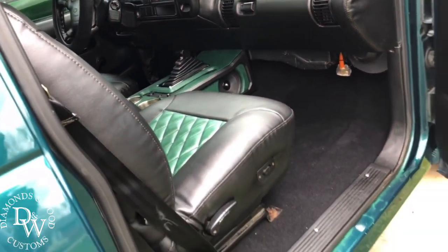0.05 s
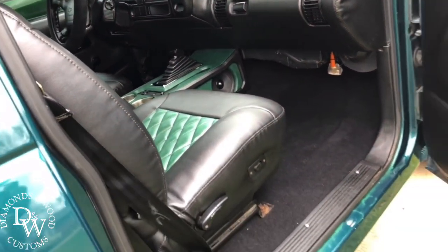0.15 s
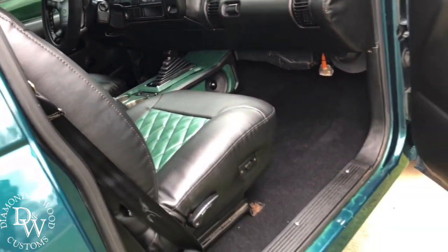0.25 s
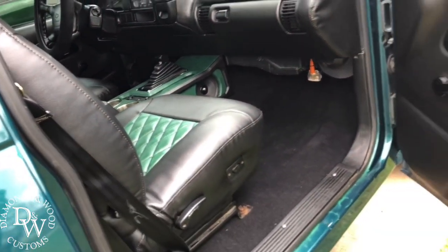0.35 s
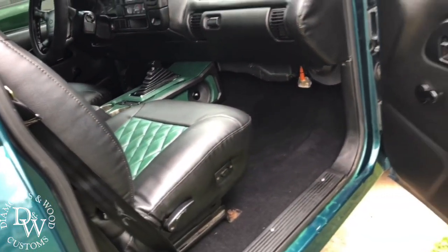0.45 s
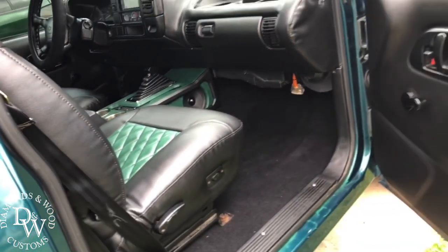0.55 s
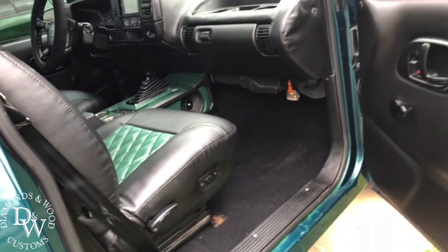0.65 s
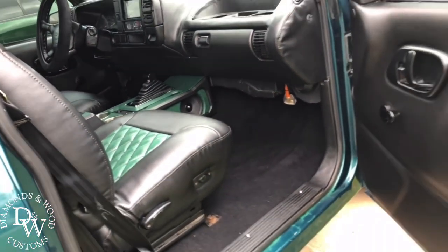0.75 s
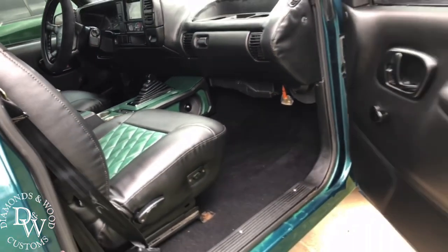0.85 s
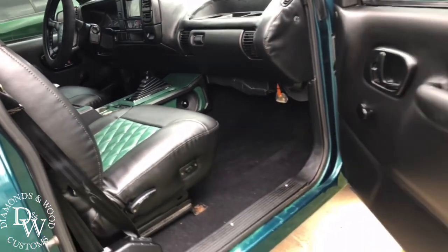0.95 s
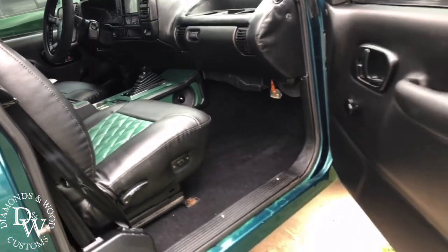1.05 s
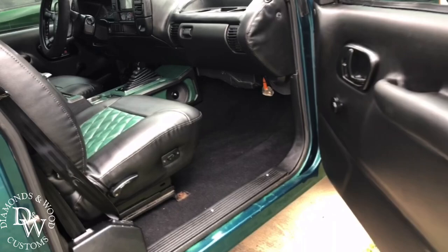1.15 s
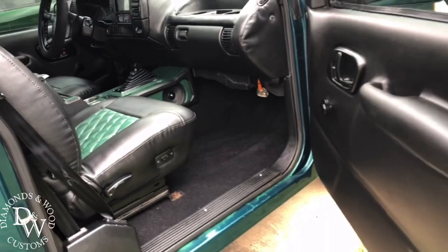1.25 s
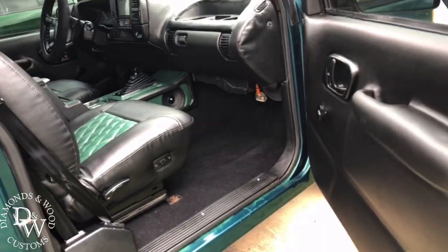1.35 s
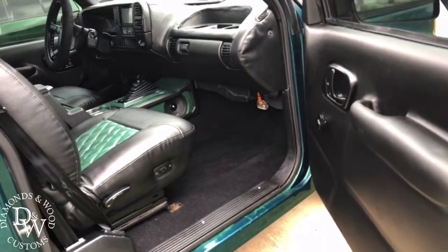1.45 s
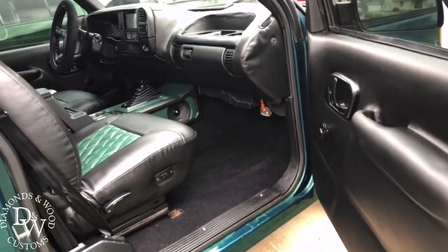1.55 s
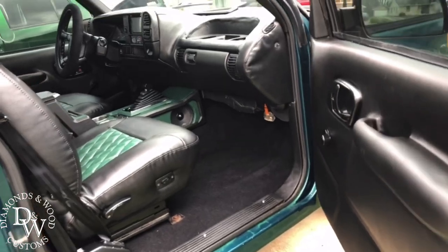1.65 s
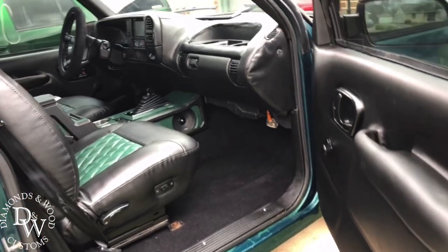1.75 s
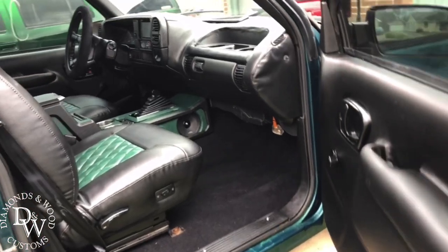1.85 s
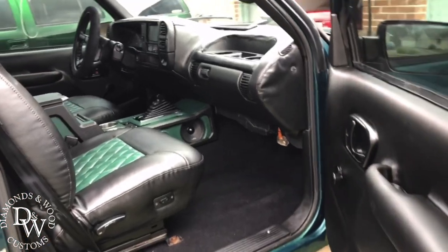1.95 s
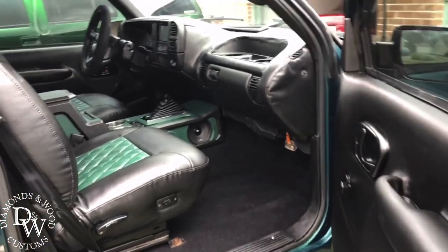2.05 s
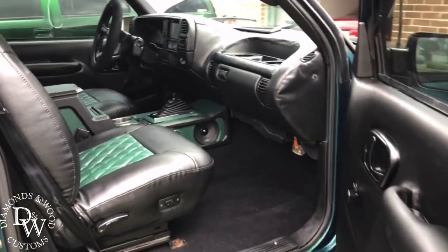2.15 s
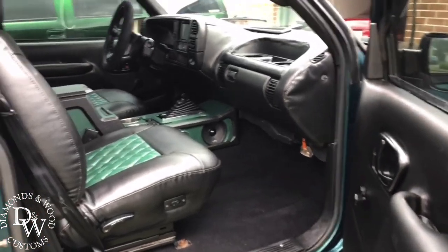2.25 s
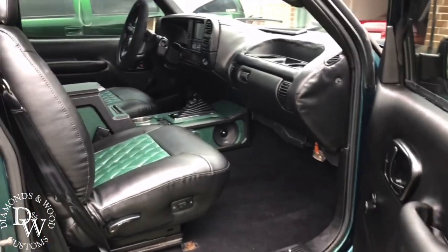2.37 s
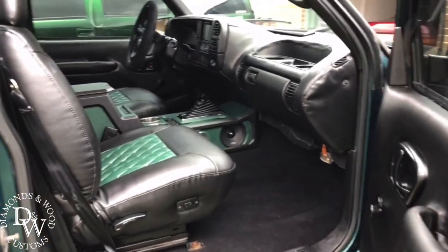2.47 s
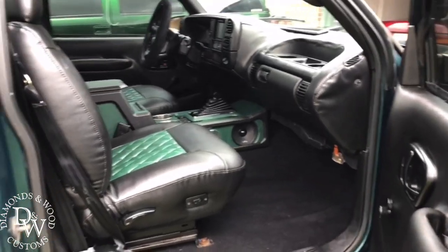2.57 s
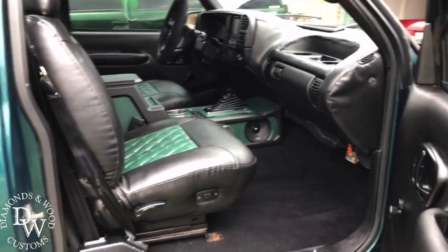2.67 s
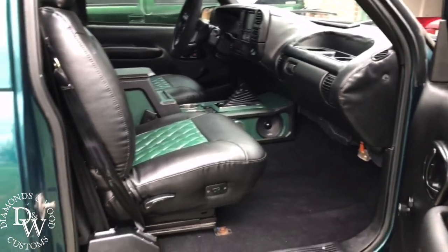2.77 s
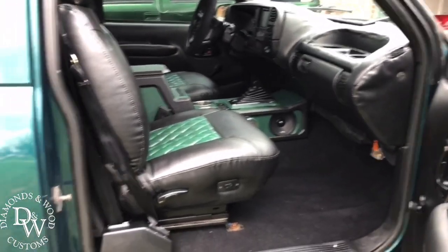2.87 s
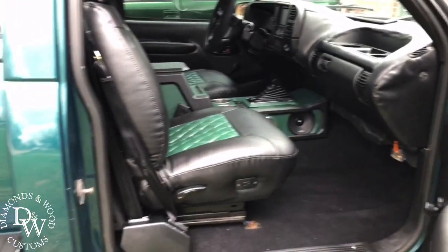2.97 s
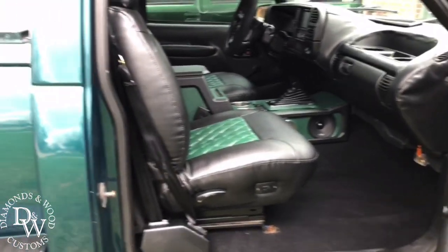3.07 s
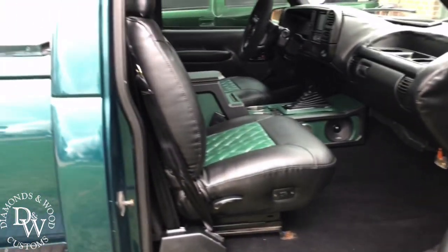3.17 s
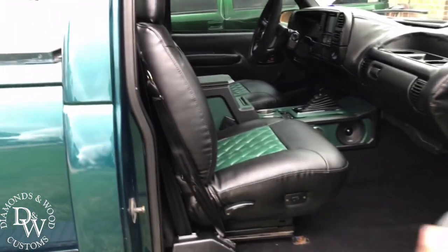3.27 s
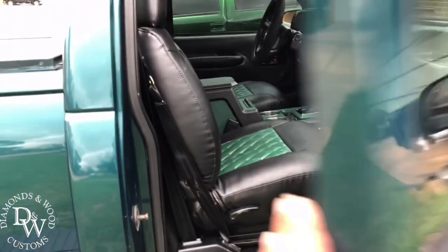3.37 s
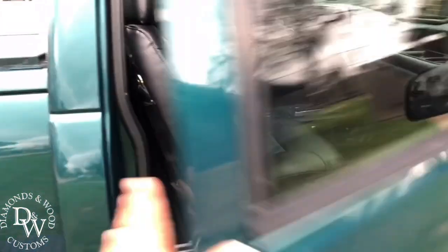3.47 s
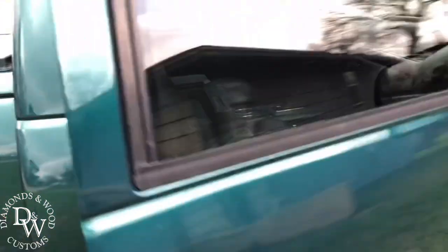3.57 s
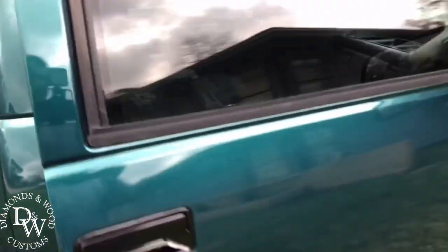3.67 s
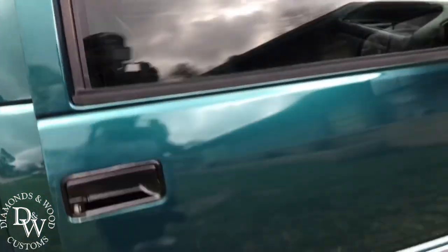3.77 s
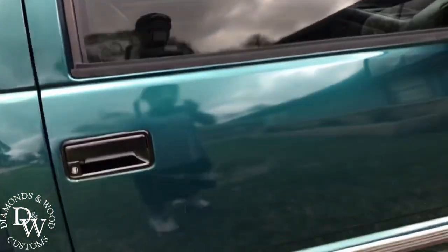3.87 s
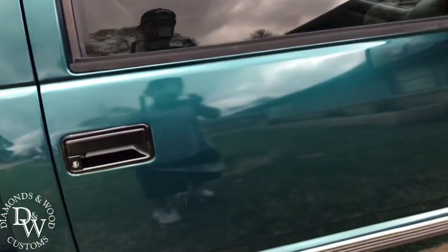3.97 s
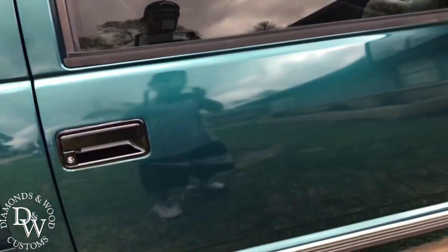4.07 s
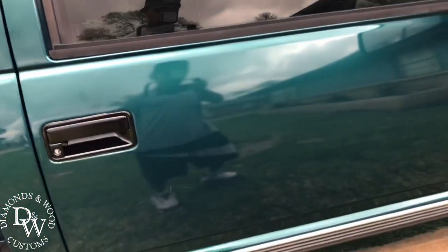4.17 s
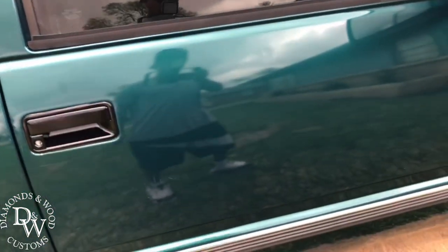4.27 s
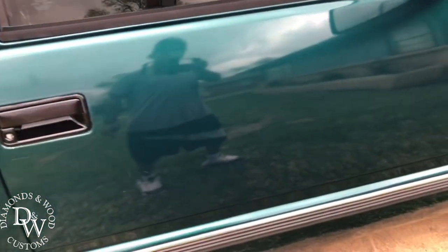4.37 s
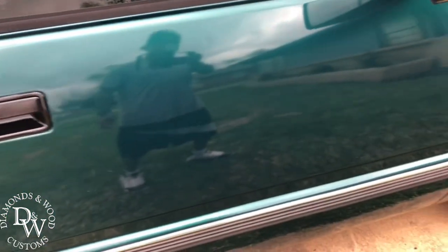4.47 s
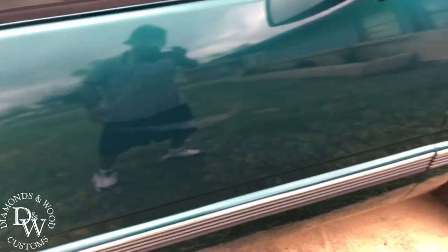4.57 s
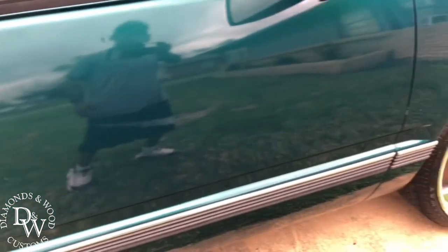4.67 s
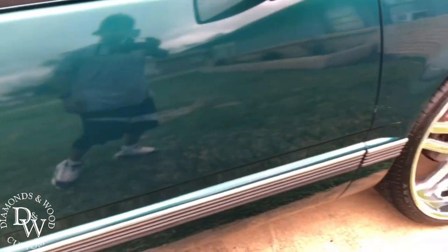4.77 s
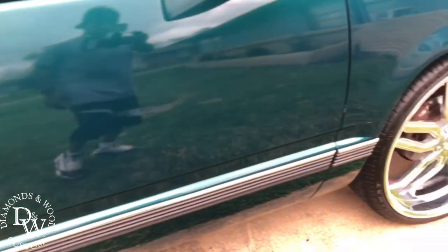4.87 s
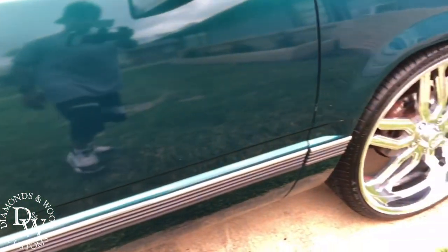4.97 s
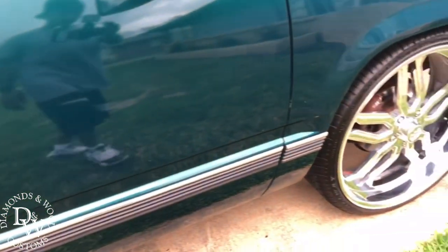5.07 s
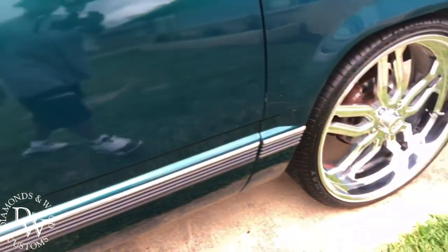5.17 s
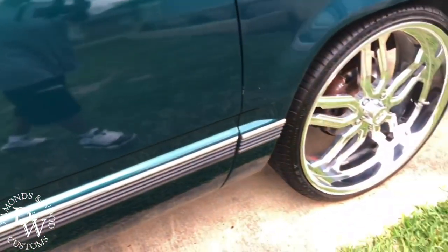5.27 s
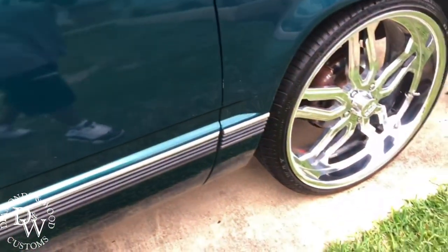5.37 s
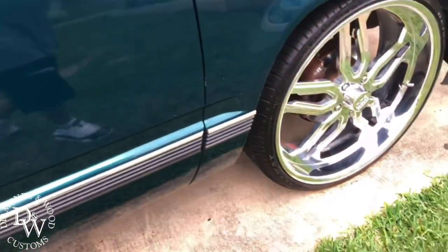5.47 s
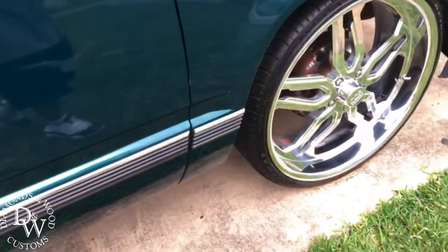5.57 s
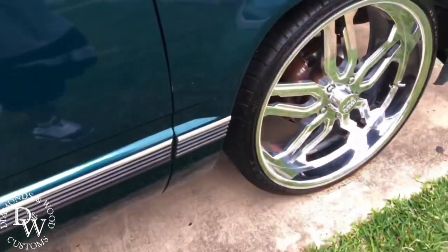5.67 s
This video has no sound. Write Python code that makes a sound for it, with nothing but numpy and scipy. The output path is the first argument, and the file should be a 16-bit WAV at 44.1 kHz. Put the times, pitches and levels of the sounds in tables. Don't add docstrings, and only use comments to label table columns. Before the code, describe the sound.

Quiet outdoor background of far road roar with thin tyre whine. Someone moves close to the microphone, clothes rustling, feet thudding softly, grit and hinge ticking; a tiny bird chirp falls just before the door moves. A swelling whoosh ends in a single hard, solid vehicle door slam with rattling rebounds and low boom, dying within about half a second. Faint movement and steady traffic remain.

```python
import sys
import numpy as np
from scipy import signal
from scipy.io import wavfile

SR = 44100
rng = np.random.default_rng(int(sys.argv[2]) if len(sys.argv) > 2 else 0)


def natural_amplitude(level_db):
    exponent = np.asarray(level_db, float) / 20
    return 10 ** exponent


def master(y):
    cut = np.clip(np.atleast_2d(y).T, -1, 1)
    pcm = np.round(cut * 32767)
    wavfile.write(sys.argv[1], SR, pcm.astype(np.int16))


N = 252252
TIME = np.arange(N) / SR

# [t/s, level/dB]
ROAD_LEVEL = [
    (0.0, -52),
    (1.58, -49.5),
    (2.87, -50),
    (3.18, -48),
    (3.92, -48.5),
    (4.46, -50),
    (5.07, -50),
    (5.72, -50),
]
# [f/Hz, level/dB per Hz]
RUMBLE_COLOUR = [(15, -47), (25, -15), (81, 0), (113, -6), (168, -5.5), (193, -9), (289, -20), (336, -35.5),
                 (400, -18.5), (520, -69), (880, -120)]
# [f/Hz, level/dB per Hz]
ROAR_COLOUR = [(150, -11), (250, -2.5), (330, -4), (436, -4), (557, -2.5), (1100, 0.5), (2570, -20),
               (3460, -26.5), (10400, -41), (15200, -53), (16000, -32)]
# [start t/s, length/s, first f/Hz, glide/Hz per s, level/dB]
TYRE_WHINES = [(.6, 0.62, 905, -29, -60), (1.33, 0.2, 752, 2, -55), (1.78, 0.53, 1126, -3.5, -54),
               (2.32, 0.88, 916, -5.5, -58.5), (2.98, .24, 790, -30.5, -59), (3.22, .45, 1135, -55, -62),
               (4.2, 0.92, 1057, -8., -65), (5.25, 0.64, 899, -170., -54.5)]
# [start t/s, length/s, level/dB]
INSECT_BOUTS = [
    (1.28, 1.85, -82),
    (4.344, 0.57, -77.5),
]
# [start t/s, length/s, first f/Hz, glide/Hz per s, level/dB]
BIRD_CHIRP = [
    (2.715, .07, 8500, -16500, -75),
]
# [start t/s, length/s, level/dB]
MOVEMENTS = [(0.0, 0.31, -69.5), (0.274, 0.18, -69.5), (0.55, 0.37, -66), (0.919, 0.064, -66),
             (0.964, 0.14, -71.5), (1.1, .16, -68), (1.457, 0.36, -69), (1.694, 0.45, -68.5),
             (2.063, 0.1, -68.5), (2.312, 0.14, -66.5), (2.39, 0.058, -59), (2.464, .34, -74),
             (3.069, 0.18, -68.5), (3.31, 0.056, -70.5), (3.42, .065, -76), (3.53, 0.038, -71.5),
             (3.77, 0.043, -86), (4.095, 0.16, -73), (4.20, 0.096, -69.5), (4.264, 0.061, -61.5),
             (4.32, 0.29, -70), (4.665, 0.07, -72), (4.764, 0.11, -68.5), (4.948, 0.12, -68.5),
             (5.06, 0.24, -64.5), (5.294, 0.072, -64.5), (5.35, 0.22, -68), (5.554, .09, -66.5)]
# [f/Hz, level/dB per Hz]
CLOTH_COLOUR = [(1180, -24), (2000, 2), (2360, -2.5), (4080, -4), (8330, -4.5), (13600, -4), (15100, 1.5),
                (16000, -7)]
# [t/s, peak level/dB, centre f/Hz, width/octaves]
TICKS = [(.629, -52.5, 7000, 0.5), (.820, -50, 8000, 1.8), (0.947, -45, 3700, 2.1),
         (1.126, -56, 10000, 1.05), (1.301, -56, 12000, 1.24), (1.791, -50, 6060, 3), (2.849, -37, 700, 2),
         (2.926, -46, 8000, 3.4), (2.927, -52, 5240, 0.069), (3.003, -51, 4405, .06),
         (3.003, -53, 3800, .06), (3.270, -52, 4170, 0.31), (3.338, -52, 4600, 0.81),
         (3.448, -50, 7000, 2.5), (3.457, -59, 12000, 1.1), (3.466, -43.5, 3180, 2),
         (3.465, -37, 2400, 0.34), (3.621, -46, 7000, 2.4), (3.621, -46, 2500, 1.1),
         (4.717, -59, 12000, .9), (4.80, -55, 4920, 1.9), (4.987, -52.5, 4500, 1.4),
         (5.311, -52.5, 4000, 1.6), (5.43, -55, 5000, 1.6), (5.585, -51, 6000, 2.3)]
# [t/s, peak level/dB, f/Hz]
THUDS = [(.604, -52, 83.6), (1.405, -38, 91.5), (1.447, -31, 102), (2.066, -44, 78.4), (2.851, -30, 199),
         (2.890, -31.5, 199), (2.932, -34, 90), (3.141, -26.5, 180), (3.158, -32, 125), (3.183, -32.5, 180),
         (3.20, -32.5, 75.6), (3.54, -35, 207), (3.575, -34.5, 248), (3.590, -31, 94), (3.605, -39, 186),
         (3.618, -27, 77), (3.655, -34, 98), (3.70, -32.5, 80.5), (4.68, -36, 89), (5.425, -36, 87),
         (5.61, -39, 70), (5.68, -35.5, 75)]
# [peak t/s, level/dB, rise/dB per s, fall/dB per s, bright share/1]
AIR_RUSHES = [
    (3.39, -46.5, 200., 250., .04),
    (3.63, -43.5, 312, 125., 0.083),
    (3.857, -29, 896, 4400., 0.47),
]
# [t/s, peak level/dB, f/Hz]
BOOMS = [(3.868, -15.5, 69.6), (3.871, -5.5, 287), (3.874, -20, 155), (3.876, -22, 393), (3.882, -11, 216),
         (3.888, -11.5, 305), (3.882, -10, 42), (3.905, -13, 144), (3.921, -10.5, 186), (3.926, -8.5, 52),
         (3.927, -10, 97.2), (3.952, -10.5, 135.5), (3.972, -14.5, 99), (3.995, -16.5, 78),
         (4.015, -24.5, 157), (4.070, -22.5, 151), (4.078, -21.5, 92), (4.105, -28, 43.6),
         (4.142, -27.5, 146), (4.205, -28, 70.6), (4.265, -27, 77), (4.31, -37, 59.4), (4.40, -35, 86),
         (4.50, -32, 63.5)]
# [t/s, peak level/dB, f/Hz]
TRIM_RINGS = [(3.872, -5, 836), (3.886, -6, 690), (3.942, -24.5, 1270), (3.962, -21, 695),
              (3.982, -25, 822), (4.012, -22.5, 637), (4.028, -25.5, 847), (4.082, -31, 822),
              (4.125, -41, 810)]
# [t/s, peak level/dB, centre f/Hz, width/octaves]
LATCH_RINGS = [(3.848, -49, 6000, 1.2), (3.8575, -13, 1750, 0.26), (3.8575, -13, 2440, 0.34),
               (3.868, -14, 1300, 0.47), (3.858, -33, 9000, .08), (3.866, -18.5, 4000, 0.18),
               (3.873, -17, 6120, 0.1), (3.874, -21.5, 9560, 0.059), (3.874, -23, 11850, 0.079),
               (3.878, -30, 7500, .06), (3.892, -27, 6160, 0.12), (3.907, -37, 6300, 0.13),
               (3.929, -31, 9200, .08), (3.977, -48, 8700, 0.083)]
# [t/s, metal level/dB, glass level/dB]
CONTACTS = [(3.8579, -5, -34), (3.865, -14, -32.5), (3.8702, -2.5, -29), (3.872, -15, -27),
            (3.881, -1.5, -27), (3.888, -2.5, -25.5), (3.895, -10, -30), (3.9054, -13, -40),
            (3.915, -16, -41), (3.9273, -21, -30.5), (3.9356, -27, -41), (3.9494, -32, -47),
            (3.9644, -22, -46), (3.9764, -31, -38.5), (3.9875, -36, -49), (4.018, -29, -46.5),
            (4.0344, -30, -53), (4.0617, -31, -52.5), (4.0844, -38, -66)]
# [f/Hz, level/dB per Hz]
METAL_COLOUR = [(500, 3.5), (900, -3), (1400, -2.5), (2200, -10), (3200, -16.5), (5000, -20)]
# [f/Hz, level/dB per Hz]
GLASS_COLOUR = [(3000, -4.5), (4500, -6.5), (6200, 5.5), (8000, -6), (9600, 4), (12000, -7), (16000, -7)]
# [t/s, peak level/dB]
BLOWS = [(3.861, -6), (3.870, -7), (3.877, -7), (3.886, -9.5), (3.895, -11.5), (3.904, -5.5), (3.916, -19),
         (3.928, -15), (3.944, -17.5), (3.957, -17), (3.973, -21), (3.99, -25), (4.012, -29),
         (4.030, -26.5), (4.058, -32), (4.08, -29)]
# [f/Hz, level/dB, t60/s]
PANEL_MODES = [(233.4, -12.5, 0.13), (285.7, -13.5, 0.13), (370, -9, 0.042), (413, -27, 0.11),
               (447, -15.5, 0.058), (510, -15, 0.059), (564, -15, 0.098), (610, -18, 0.07),
               (690, -28.5, 0.087), (746, -16, 0.067), (853, -15, 0.05), (910, -41, 0.12), (950, -25, 0.15),
               (1250, -31, 0.084), (1276, -52, .04), (1513, -36, .07), (1790, -18.5, 0.046)]
# [delay t/s, level/dB]
ECHOES = [
    (.021, -38),
    (.047, -14),
    (.083, -23),
    (.131, -32.5),
]

RUMBLE_DB, RUMBLE_FOLLOWS = -49, 0.2
HUM_HZ, HUM_WIDTH_HZ, HUM_DB = 85, 7.9, -56
SHUDDER_S, SHUDDER_DB, SHUDDER_RISE_DB_PER_S, SHUDDER_FALL_DB_PER_S = 4.04, -35.5, 122, 49
CLOTH_ATTACK_SHARE, CLOTH_RELEASE_SHARE = 0.32, 0.28
CLOTH_LEAD_S, CLOTH_REST_DB = 0.025, -75.5
TICK_T60_S, LATCH_T60_S = 0.031, 0.033
THUD_T60_S, BOOM_T60_S, TRIM_T60_S = 0.11, 0.11, 0.18
DAMPING_SLOPE = 0.5
CONTACT_T60_S, CONTACT_RISE_S, SOFTENING = 0.081, 0.00055, 0.011


def rms_one(x):
    return x / np.sqrt(np.mean(x ** 2) + 1e-20)


def drift(rate):
    r = np.exp(-80 * np.pi * rate / SR)
    slow = signal.lfilter([1], [1, -2 * r, r * r], rng.standard_normal(N // 40 + 2002))[2000:]
    return np.interp(np.arange(N) / 40, np.arange(len(slow)), rms_one(slow))


def band(x, low_hz, high_hz):
    edges = np.clip([low_hz, high_hz], [15, 20], [.4 * SR, .45 * SR])
    return signal.sosfilt(signal.butter(2, edges, "band", fs=SR, output="sos"), x)


def coloured(sources, spectrum, patchy_db):
    hz, level_db = np.transpose(spectrum)
    bands = round(3 * np.log2(hz[-1] / hz[0]))
    edges = np.geomspace(hz[0], hz[-1], bands + 1)
    out = 0
    for k, (low, high) in enumerate(zip(edges, edges[1:])):
        gain_db = np.interp(np.log(low * high) / 2, np.log(hz), level_db)
        out = out + natural_amplitude(gain_db + patchy_db * drift(5.2)) * band(sources[k % 2], low, high)
    return out


def grains(shape, per_s, spread_db, smooth):
    sizes = natural_amplitude(spread_db * np.minimum(rng.exponential(1, shape), 4)) * rng.choice([-1, 1], shape)
    clicks = rms_one(sizes * (rng.random(shape) < per_s / SR))
    return rms_one(smooth * rng.standard_normal(shape) + clicks)


def ring(clicks, hz, t60):
    r, w = natural_amplitude(-60 / (t60 * SR)), 2 * np.pi * hz / SR
    return signal.lfilter([0, np.sin(w)], [1, -2 * r * np.cos(w), r * r], clicks + 1e-18)


def add(out, s, sound):
    at = round(s * SR)
    out[at:at + len(sound)] += sound[:N - at]


def hold(start, length, attack_s, release_s):
    attack, release = (TIME - start) / attack_s, (start + length - TIME) / release_s
    return np.clip(np.minimum(attack, release), 0, 1)


def tent(s, peak_db, rise, fall):
    return natural_amplitude(peak_db - np.maximum(rise * (s - TIME), fall * (TIME - s)))


def glides(rows, fade_s):
    out = np.zeros(N)
    for s, length, hz, glide, db in rows:
        t = TIME - s
        out += natural_amplitude(db) * hold(s, length, fade_s, fade_s) * np.sin(2 * np.pi * t * (hz + glide * t / 2))
    return out


def pushes(rows, t60_100, rise_cycles):
    out, t = np.zeros(N), TIME[:30000]
    for s, peak_db, hz in rows:
        t60 = t60_100 * (100 / hz) ** DAMPING_SLOPE
        swell = 1 - np.exp(-t * hz / rise_cycles)
        add(out, s, natural_amplitude(peak_db - 60 * t / t60) * swell * np.sin(2 * np.pi * hz * t))
    return out


def bursts(rows, t60, rise_s):
    out, t = np.zeros(N), TIME[:6000]
    shape = natural_amplitude(-60 * t / t60) * (1 - np.exp(-t / rise_s))
    noises = rng.standard_normal((len(rows), len(t)))
    for (s, peak_db, hz, octaves), noise in zip(rows, noises):
        half = 2 ** (np.clip(octaves, .03, 4) / 2)
        burst = shape * band(noise, hz / half, hz * half)[::-1]
        add(out, s, natural_amplitude(peak_db - 3) * rms_one(burst) * np.sqrt(np.mean(shape ** 2)))
    return out


def engine_hum():
    hum = rms_one(band(rng.standard_normal(N), HUM_HZ - HUM_WIDTH_HZ / 2, HUM_HZ + HUM_WIDTH_HZ / 2))
    firing_hz = HUM_HZ + 2.42 * drift(0.813)
    hum += natural_amplitude(1.5) * np.sin(2 * np.pi * np.cumsum(firing_hz) / SR)
    octave = band(rng.standard_normal(N), 2 * HUM_HZ - HUM_WIDTH_HZ, 2 * HUM_HZ + HUM_WIDTH_HZ)
    return natural_amplitude(HUM_DB) * (hum + natural_amplitude(-11.5) * rms_one(octave))


def road():
    roar_db = np.interp(TIME, *np.transpose(ROAD_LEVEL))
    rumble = rms_one(coloured(rng.standard_normal((2, N)), RUMBLE_COLOUR, patchy_db=0.24))
    roar = rms_one(coloured(rng.standard_normal((2, N)), ROAR_COLOUR, patchy_db=1.25))
    flutter = rms_one(3.3 + drift(21.0))
    whine = flutter * natural_amplitude(1.0) * glides(TYRE_WHINES, fade_s=0.066)
    traffic = natural_amplitude(RUMBLE_DB + RUMBLE_FOLLOWS * (roar_db - roar_db.mean()))
    shudder = tent(SHUDDER_S, SHUDDER_DB, SHUDDER_RISE_DB_PER_S, SHUDDER_FALL_DB_PER_S)
    return np.hypot(traffic, shudder) * rumble + natural_amplitude(roar_db + 0.5) * roar + whine


def insect():
    level = sum(natural_amplitude(db) * hold(s, length, 0.074, 0.28) for s, length, db in INSECT_BOUTS)
    throb = .6 + np.sin(np.pi * 45 * TIME) ** 2
    return level * rms_one(throb * band(rng.standard_normal(N), 9400, 9740))


def bird():
    return glides(BIRD_CHIRP, fade_s=.015)


def clothes():
    power = np.full(N, natural_amplitude(2 * CLOTH_REST_DB))
    for s, length, db in MOVEMENTS:
        swell = hold(s - CLOTH_LEAD_S, length + 2 * CLOTH_LEAD_S,
                     CLOTH_ATTACK_SHARE * length, CLOTH_RELEASE_SHARE * length)
        power += (natural_amplitude(db) * swell) ** 2
    fibres = grains((2, N), per_s=1400.0, spread_db=14.0, smooth=3.2)
    cloth = rms_one(coloured(fibres, CLOTH_COLOUR, patchy_db=1.4))
    return np.sqrt(power) * natural_amplitude(2.0 + 1.2 * drift(26)) * cloth


def ticks():
    return bursts(TICKS, TICK_T60_S, rise_s=0.00062)


def thuds():
    return pushes(THUDS, THUD_T60_S, rise_cycles=0.27)


def swing():
    noise = rng.standard_normal((2, N))
    dull, bright = rms_one(band(noise[0], 160, 730)), rms_one(band(noise[1], 720, 2100))
    return sum(tent(s, db, rise, fall) * (dull + share * bright) for s, db, rise, fall, share in AIR_RUSHES)


def cabin_boom():
    return pushes(BOOMS, BOOM_T60_S, rise_cycles=0.27)


def trim():
    return pushes(TRIM_RINGS, TRIM_T60_S, rise_cycles=2.9)


def latch():
    return bursts(LATCH_RINGS, LATCH_T60_S, rise_s=0.00056)


def clatter():
    metal, glass, t = np.zeros(N), np.zeros(N), TIME[:9000]
    for s, metal_db, glass_db in CONTACTS:
        rise_s = CONTACT_RISE_S + SOFTENING * (s - CONTACTS[0][0])
        fading = natural_amplitude(-120 * t / CONTACT_T60_S) * (1 - np.exp(-t / rise_s)) ** 2
        add(metal, s, natural_amplitude(2 * (metal_db - 11)) * fading)
        add(glass, s, natural_amplitude(2 * (glass_db + 0.5)) * fading)
    spray = grains((2, N), per_s=3000., spread_db=4, smooth=0.81)
    dull = rms_one(coloured(spray, METAL_COLOUR, patchy_db=1.5))
    bright = rms_one(coloured(spray, GLASS_COLOUR, patchy_db=1.0))
    return np.sqrt(metal) * dull + np.sqrt(glass) * bright


def panel():
    s, peak_db = np.transpose(BLOWS)
    at, out = np.round(s * SR).astype(int), np.zeros(N)
    for hz, level_db, t60 in PANEL_MODES:
        side, strength = rng.standard_normal((2, len(at)))
        clicks = np.zeros(N)
        clicks[at] = natural_amplitude(peak_db + level_db + 2.4 * strength) * np.sign(side)
        out += ring(clicks, hz, t60)
    return out


def yard(x):
    out, dull = x.copy(), band(x, 120, 3800)
    for s, level_db in ECHOES:
        add(out, s, natural_amplitude(level_db) * dull)
    return out


def scene():
    background = road() + engine_hum() + insect() + bird()
    person = clothes() + ticks() + thuds()
    slam = yard(clatter() + panel() + latch() + trim()) + cabin_boom() + swing()
    return (background + person + slam)[None]


def top_cut(x):
    return signal.sosfilt(signal.butter(12, 16850, fs=SR, output="sos"), x)


def record(dry):
    bass_cut = signal.sosfilt(signal.butter(4, 40, "high", fs=SR, output="sos"), dry)
    rounded = 1.2 * np.tanh(bass_cut / 1.2)
    mix = signal.sosfilt(signal.cheby2(14, 45, 16100, fs=SR, output="sos"), rounded)
    return top_cut(mix)


dry = scene()
out = record(dry)
master(out)
```